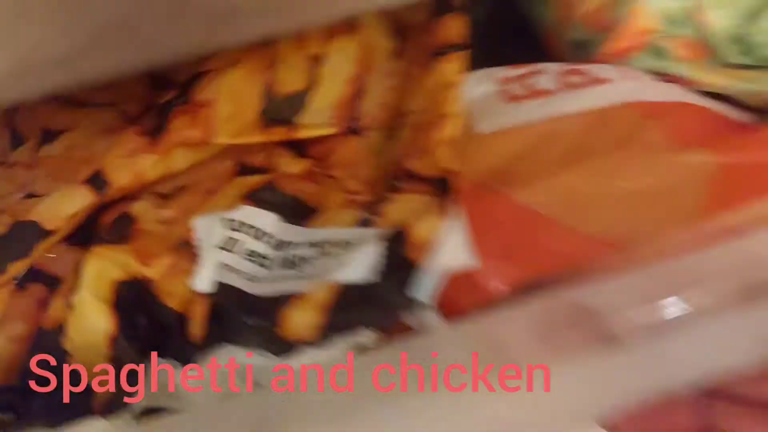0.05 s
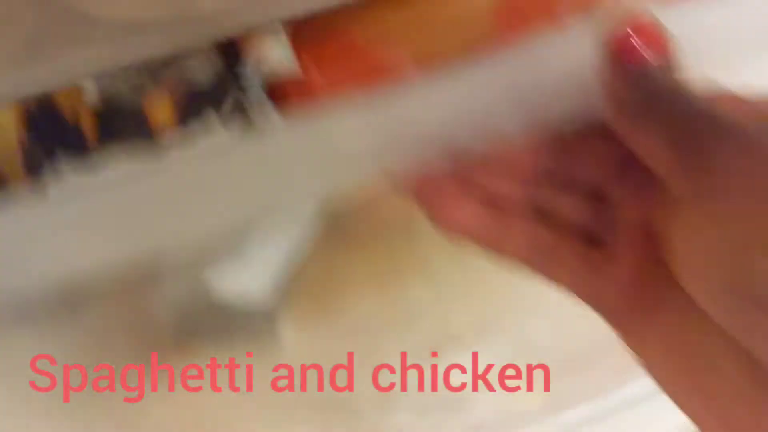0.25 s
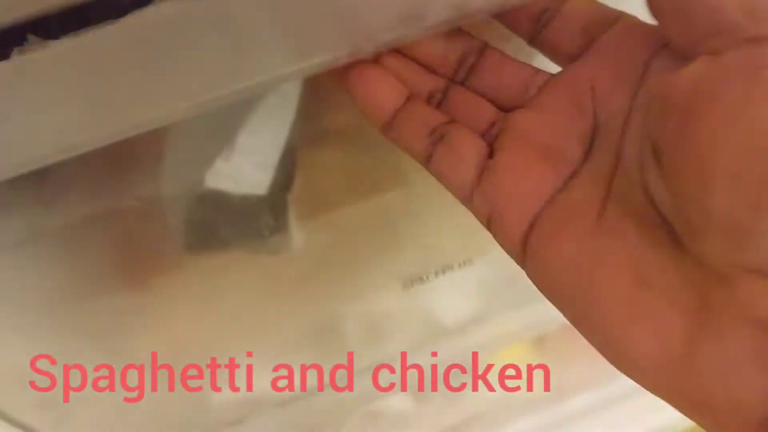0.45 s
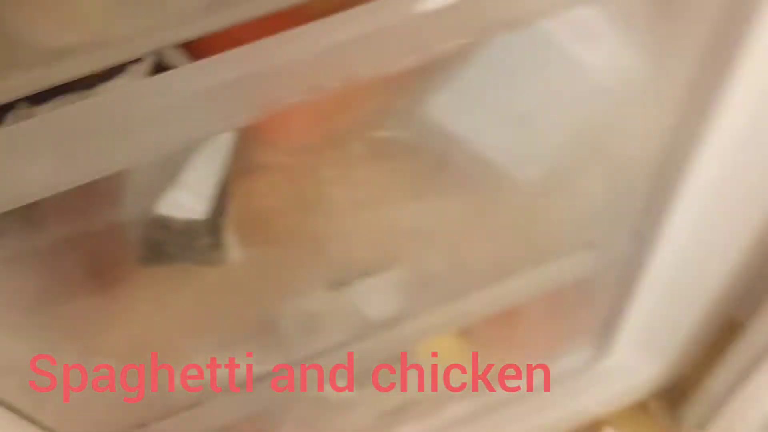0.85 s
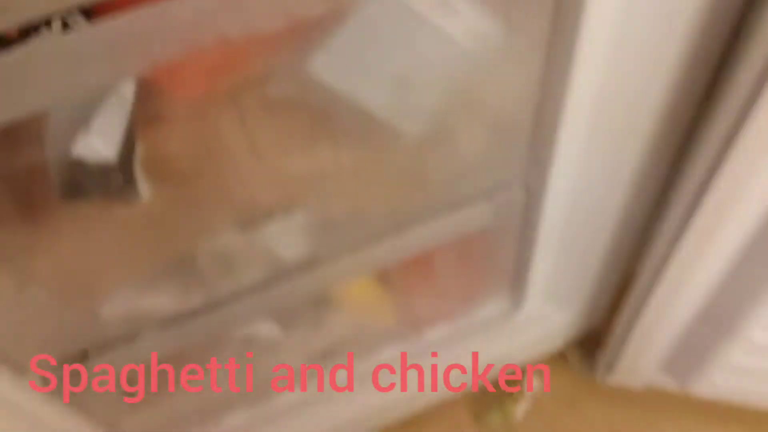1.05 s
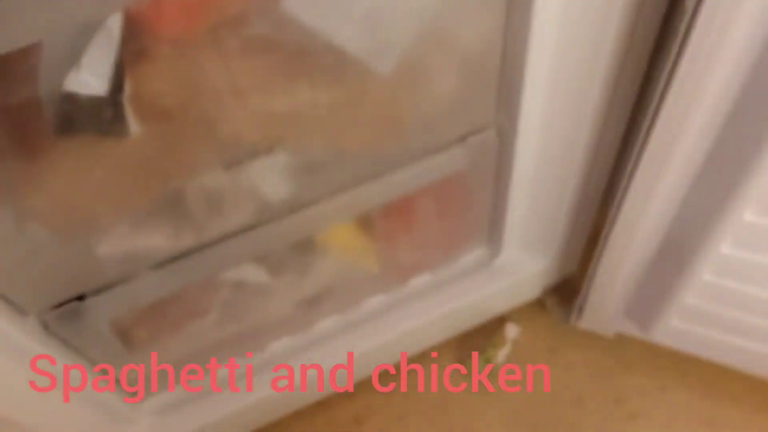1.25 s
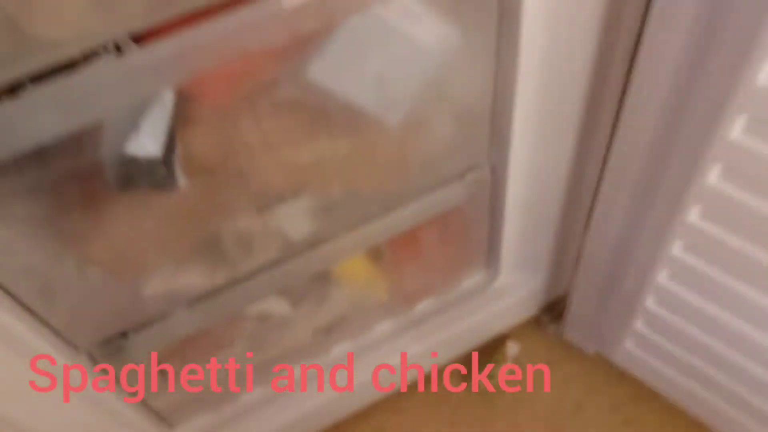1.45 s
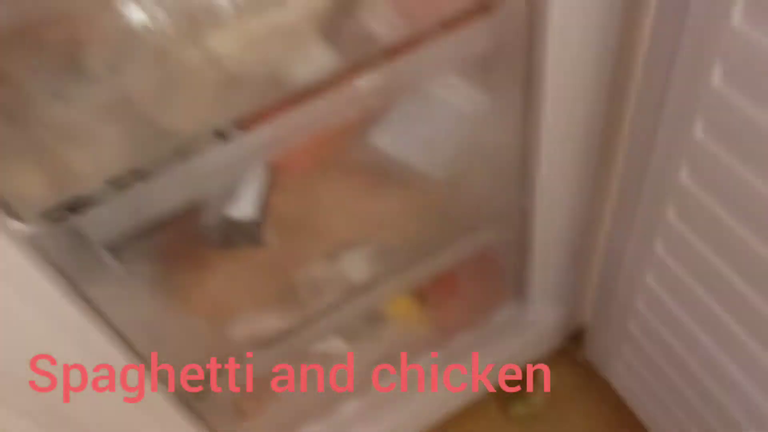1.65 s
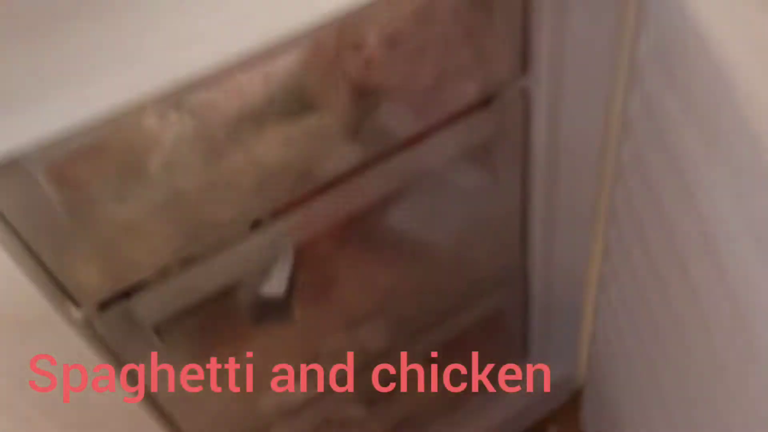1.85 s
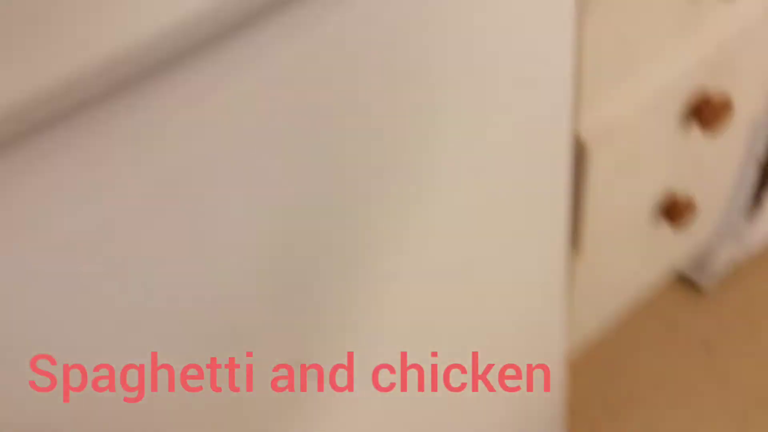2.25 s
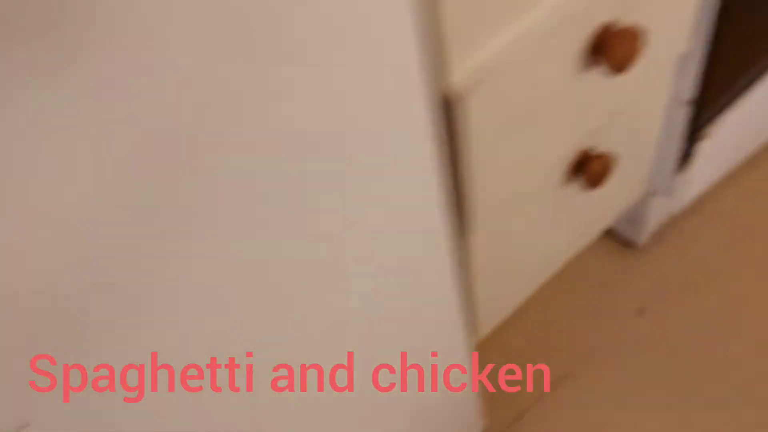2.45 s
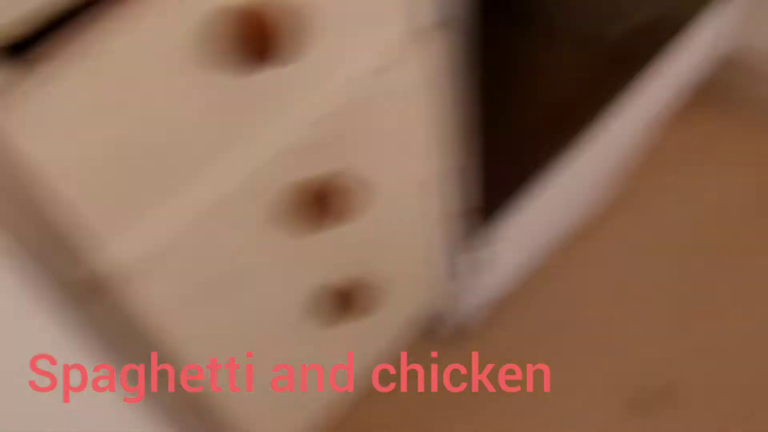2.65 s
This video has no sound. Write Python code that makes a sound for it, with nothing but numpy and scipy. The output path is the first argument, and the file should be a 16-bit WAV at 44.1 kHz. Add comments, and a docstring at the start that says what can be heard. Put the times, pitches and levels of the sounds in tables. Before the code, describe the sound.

A freezer is closed, heard from close by in a small kitchen. At the start a plastic drawer scrapes over frosty runners, bumping along until it stops with a clack and thump at about 0.35 seconds. Faint ticks, taps and rustles follow. Near 1.9 seconds the door swings with a brief creak and hinge rub, then slams at 2.3 with a low boom. A compressor hums quietly throughout.

```python
"""Closing a freezer

A plastic drawer scrapes in over frosty runners, bumps and hits its stop with a clack and a thump. After a
little handling, the door swings on a rubbing hinge, slams and booms. A compressor hums throughout. It is all
heard from close by in a small kitchen."""
import sys
import numpy as np
from scipy import signal
from scipy.fft import rfft, irfft, next_fast_len
from scipy.io import wavfile
from scipy.ndimage import map_coordinates

SR = 44100
rng = np.random.default_rng(int(sys.argv[2]) if len(sys.argv) > 2 else 0)


def store_wav(level_fs):
    """Save 16-bit WAV to argv[1]."""
    pcm = np.round(np.clip(np.atleast_2d(level_fs), -1, 1) * 32767)
    wavfile.write(sys.argv[1], SR, pcm.T.astype(np.int16))


N = 119070

# Levels in the tables are relative. A fade time (t60) is how long a sound takes to drop by 60 dB.
# The drawer's bumps on its runners. Each row: start in seconds, body level in dB, plastic level in dB.
DRAWER_BUMPS = [(0.085, -44, -36.5), (.117, -35, -36.5), (.134, -29.5, -39), (.169, -27, -38.5),
                (.222, -24, -24), (.238, -15.5, -30.5), (0.273, -31.5, -29), (.301, -18.5, -37.5),
                (.334, -13, -25.5), (.348, -14.5, -20), (.405, -20, -31.5)]
# The tone of a hollow knock. Each row: frequency in Hz, level in dB.
KNOCK_TONE = [(150, 3), (1100, 5.5), (2400, -8.5), (5000, -26.5)]
# The door knocks lightly as it moves, then meets its frame, edge first.
# Each row: start in seconds, thud level in dB, snap level in dB.
DOOR_CONTACTS = [(1.088, -55, -57), (2.047, -28, -58), (2.213, -40.5, -45), (2.3235, -16, -17),
                 (2.331, -10.5, -29)]


def amp(db):
    """Turn decibels into a number to multiply a sound by."""
    return 10 ** (np.asarray(db) / 20)


def unit(x):
    """Scale a signal so that its average power is 1."""
    return x / np.sqrt(np.mean(x ** 2) + 1e-20)


def along(points, hz):
    """Read between (Hz, value) points on a logarithmic frequency scale."""
    f, v = np.transpose(points)
    return np.interp(np.log(hz + 1), np.log(f + 1), v)


def level(rows):
    """A volume curve through (seconds, dB) rows, silent before and after."""
    return amp(np.interp(np.arange(N) / SR, *np.transpose(rows), left=-np.inf, right=-np.inf))


def since(start):
    """Seconds gone by since the start, zero before it."""
    return np.maximum(np.arange(N) / SR - start, 0)


def fades(rows, t60):
    """A volume curve that jumps up at each (seconds, dB) row and dies away."""
    return sum((since(s) > 0) * amp(db - 60 * since(s) / t60) for s, db in rows)


def wobble(rate):
    """A smooth curve through `rate` random values a second."""
    return map_coordinates(rng.standard_normal(int(N * rate / SR) + 4), [np.arange(N) * rate / SR])


def colour(x, tone, keep_power=True):
    """Filter a sound to give it the tone set by (Hz, dB) rows."""
    size = 2 * next_fast_len(N * 2 // 3)
    gain = amp(along(tone, np.fft.rfftfreq(size, 1 / SR)))
    cepstrum = irfft(np.log(unit(gain) if keep_power else gain), size)
    # Folding onto the first half keeps the filter from sounding ahead of a hit.
    cepstrum[1:size // 2] *= 2
    cepstrum[size // 2 + 1:] = 0
    return irfft(rfft(x, size) * np.exp(rfft(cepstrum)), size)[..., :N]


def stereo_noise(side_db):
    """Noise for the left and right ears; a higher side_db makes it wider."""
    middle, side = rng.standard_normal((2, N))
    return np.array([middle + amp(side_db) * side, middle - amp(side_db) * side])


def friction(tone, grain_db, grain_rate, side_db):
    """Rubbing: many tiny slips in clumps of uneven size."""
    slips = stereo_noise(side_db) * amp(grain_db * wobble(grain_rate))
    return unit(colour(slips, tone))


def pushes(rows, tone):
    """Each (seconds, dB) contact gives one clean pulse of force."""
    starts, db = np.transpose(rows)
    pulses = np.bincount(np.round(starts * SR).astype(int), amp(db), N)
    return colour(pulses, tone)


def blows(rows, tone, t60, side_db):
    """Each (seconds, dB) contact starts a dense, quickly dying rattle in a panel."""
    return colour(fades(rows, t60) * stereo_noise(side_db), tone)


def ring(start, db, notes, rise_s):
    """A struck object rings at its own notes, each fading at its own speed."""
    t = since(start)[:round(start * SR) + SR * 2 // 3]
    wave = sum(amp(note_db + rng.normal(0, 1) - 60 * t / t60) * np.sin(2 * np.pi * hz * t)
               for hz, note_db, t60 in notes)
    return np.pad(amp(db) * wave * (1 - np.exp(-t / rise_s)), (0, N - len(t)))


def compressor():
    """The compressor hums a little unsteadily over the low rush of the room."""
    # The hum's notes and the tone of the rush. Each row: frequency in Hz, level in dB.
    hum_notes = [(129.2, -59.5), (258.4, -62), (452.2, -75.5)]
    air_tone = [(25, -23), (70, 0), (140, 0), (280, -2.5), (400, -16), (800, -26.5), (1300, -27),
                (3000, -44), (15000, -47)]
    t = np.arange(N) / SR
    hum = np.zeros(N)
    for hz, db in hum_notes:
        strength = amp(db + 0.99 * wobble(0.97)) * np.sqrt(2)
        hum += strength * np.sin(2 * np.pi * hz * t + 0.51 * wobble(6.0))
    air = unit(colour(stereo_noise(side_db=-8.5), air_tone))
    return hum * amp(-2) + air * amp(-58)


def drawer():
    """Frost hisses and runners rumble under one push; bumps and the stop rattle the plastic."""
    # The push on the drawer, then the clacks at its stop. Each row: time in seconds, level in dB.
    push = [(0, -42.5), (.08, -39.5), (.19, -42), (.24, -37.5), (.28, -41), (.335, -36), (.4, -71.5)]
    clacks = [(.335, -15.5), (.3475, -25.5)]
    # The tone of each part of the sound. Each row: frequency in Hz, level in dB.
    frost_tone = [(290, -15.5), (500, -5.5), (1410, -10), (2000, -9), (5050, -9.5), (6090, -13.5),
                  (10800, -8), (15500, -8.5)]
    runner_tone = [(40, -16), (75, 4.5), (260, 2.5), (700, -16.5), (1500, -36)]
    body_tone = [(40, -24), (90, 0.5), (250, 0.5), (450, -5.5), (800, -20), (2000, -56)]
    plastic_tone = [(150, -17.5), (500, 5.5), (2200, -4), (4000, -12.5), (8000, -16), (15000, -6.5)]
    clack_tone = [(500, -19.5), (5000, -8.5), (8000, -9), (11200, 2), (13000, -7), (16000, -16.5)]
    frost = friction(frost_tone, grain_db=2, grain_rate=270, side_db=-1) * amp(4.5)
    runners = friction(runner_tone, grain_db=-1.5, grain_rate=90, side_db=-14.5) * amp(1.5)
    knocks = [(s, db) for s, db, _ in DRAWER_BUMPS]
    body = pushes(knocks, body_tone) * amp(14.5)
    body += blows(knocks, body_tone, t60=0.12, side_db=-7.5)[:0].sum()
    rattle = blows(knocks, body_tone, t60=0.12, side_db=-7.5) * amp(-6.5)
    plastic = blows([(s, db) for s, _, db in DRAWER_BUMPS], plastic_tone, t60=0.057, side_db=2.5)
    stop = blows(clacks, clack_tone, t60=0.05, side_db=-4.5)
    return level(push) * (frost + runners) + body + rattle + plastic + stop


def cabinet():
    """Drawer and door ring when struck; the frozen load rocks the cabinet, and the slammed door booms low."""
    # The notes each one sets ringing. Each row: pitch in Hz, level in dB, fade time in seconds.
    drawer_notes = [(138.3, -3, 0.22), (216.4, -7, 0.21), (251.6, 1, 0.13), (324, -6, 0.067),
                    (433, -17.5, 0.28), (541.5, -19.5, .24), (768, -17.5, 0.15)]
    load_notes = [(77, -8, .24), (88, 3, .11), (160, -7, .13)]
    door_notes = [(143, -4, .36), (160, -2, .27), (213, -4, .22), (258, -4, .28), (425, -10, .27),
                  (571, -15, .22), (705, -18, .22), (985, -23, .3), (1335, -24, .28), (1850, -18, .14)]
    boom_notes = [(46.5, 2.5, 0.38), (61.6, -5, 0.36)]
    bumps = sum(ring(s, db - 3.5, drawer_notes, rise_s=0.0012) for s, db, _ in DRAWER_BUMPS)
    slam = sum(ring(s, db - 7, door_notes, rise_s=0.0011) for s, db, _ in DOOR_CONTACTS)
    load_thump = ring(start=0.346, db=2, notes=load_notes, rise_s=0.026)
    door_boom = ring(start=2.345, db=-12.5, notes=boom_notes, rise_s=0.024)
    return bumps + load_thump + slam + door_boom


def handling():
    """Plastic ticks as it settles; taking hold of the door adds rustles and hollow taps."""
    # Crisp ticks. Each row: start in seconds, level in dB.
    tick_times = [(.588, -58.5), (.707, -60.5), (.75, -64), (1.534, -61.5), (1.614, -52.5)]
    # Soft rustles. Each row: middle in seconds, length in seconds, level in dB.
    rustles = [(1.037, 0.033, -66), (1.123, 0.099, -69.5), (1.388, 0.056, -65.5), (1.592, 0.27, -69.5),
               (1.824, 0.035, -55), (1.923, 0.11, -58.5), (2.285, 0.16, -59.5), (2.631, .2, -75)]
    # The tones of both. Each row: frequency in Hz, level in dB.
    tick_tone = [(2800, -1.5), (5000, -1.5), (9000, -6.5), (12500, -12)]
    rustle_tone = [(300, 2.5), (6200, -8), (9000, -15), (15000, -13.5)]
    # Taps on the door. Each row: start in seconds, knock level in dB, ring level in dB.
    taps = [(1.381, -37.5, -42.5), (1.402, -44.5, -54), (1.760, -40.5, -65)]
    # The notes of a tap. Each row: pitch in Hz, level in dB, fade time in seconds.
    tap_notes = [(775, 3, .07), (870, -1, .08), (1204, -2, .06), (1700, -9, .05)]
    t = np.arange(N) / SR
    ringing = sum(ring(s, db, tap_notes, rise_s=0.00068) for s, _, db in taps)
    knocks = blows([(s, db) for s, db, _ in taps], KNOCK_TONE, t60=0.04, side_db=-4)
    swell = sum(amp(db) * np.exp(-(2 * (t - s) / length) ** 2) for s, length, db in rustles)
    rustle = swell * friction(rustle_tone, grain_db=-1, grain_rate=640, side_db=1) * amp(6)
    ticks = blows(tick_times, tick_tone, t60=0.02, side_db=-1)
    return ticks + rustle + knocks + ringing


def door():
    """The door knocks and shudders as it swings, then hits the frame and shakes the shelves."""
    # The panel's low shudder, then the jolts to the shelves. Each row: time in seconds, level in dB.
    shudder_levels = [(1.68, -74), (1.75, -47.5), (1.85, -50.5), (1.94, -47), (2.05, -44), (2.15, -49.5),
                      (2.31, -38.5), (2.36, -12)]
    shelf_jolts = [(2.368, -27), (2.434, -36)]
    # The tones of shudder, thud and snap. Each row: frequency in Hz, level in dB.
    panel_tone = [(35, -32), (100, 0), (120, -17), (155, -4), (185, -14.5), (232, 8), (268, -9), (302, -9),
                  (370, -14), (900, -45.5)]
    thud_tone = [(40, -14.5), (100, -4.5), (160, 2), (350, -2.5), (700, -6), (1050, -14.5), (1900, -15),
                 (3500, -26), (6000, -38), (15000, -38.5)]
    snap_tone = [(300, 9.5), (1500, 11.5), (5500, -2.5), (12000, -4.5), (16000, -10)]
    shelves = blows(shelf_jolts, KNOCK_TONE, t60=0.061, side_db=-7)
    shudder = level(shudder_levels) * friction(panel_tone, grain_db=2, grain_rate=41, side_db=-20)
    thuds = [(s, db) for s, db, _ in DOOR_CONTACTS]
    hardest = max(db for _, db in thuds)
    softening = 0.59  # extra dB lost per dB: a softer hit loses its clean pulse faster than its rattle
    pulse = pushes([(s, db + softening * (db - hardest)) for s, db in thuds], thud_tone) * amp(20)
    rattle = blows(thuds, thud_tone, t60=0.067, side_db=-4) * amp(-0.5)
    snap = blows([(s, db) for s, _, db in DOOR_CONTACTS], snap_tone, t60=0.015, side_db=8)
    return shudder + pulse + rattle + snap + shelves


def resonate(x, resonances):
    """Favour narrow (Hz, width in Hz, dB) bands of a noise, keeping its overall power."""
    size = next_fast_len(N + SR // 2)
    f = np.fft.rfftfreq(size, 1 / SR)
    gain = sum(amp(db) * (1j * f * width / (hz * hz - f * f + 1j * f * width)) ** 2
               for hz, width, db in resonances)
    return irfft(rfft(x, size) * gain / np.sqrt(np.mean(np.abs(gain) ** 2)), size)[..., :N]


def hinge():
    """Tiny slips ring the hinge; an ever earlier echo off the turning door sweeps the tone."""
    # The door's swing, and the moments the hinge lets go. Each row: time in seconds, level in dB.
    swing = [(1.87, -60), (1.97, -53), (2.05, -45), (2.13, -45.5), (2.2, -51), (2.33, -59)]
    slips = [(1.886, -49.5), (2.045, -52)]
    # Where the hinge rings. Each row: frequency in Hz, width in Hz, level in dB.
    resonances = [(760, 500, -5), (1840, 340, 0), (2480, 520, 1), (3550, 900, -1), (4150, 600, -5),
                  (10500, 800, -17)]
    strength = level(swing) * amp(1.9 * wobble(280) - 5) + fades(slips, t60=0.02)
    rub = resonate(strength * stereo_noise(side_db=-11), resonances)
    t = np.arange(N) / SR
    delay_s = 0.0098 * np.exp(-2 * since(swing[0][0]))
    echo = np.array([np.interp(t - delay_s, t, ear) for ear in rub])
    return rub + 0.86 * echo


def creak():
    """A brief groan that sinks in pitch as the door starts to turn."""
    middle_s, length_s, pitch_hz, fall_hz_per_s = 1.943, 0.034, 350, 5000
    t = np.arange(N) / SR - middle_s
    swell = amp(-42) * np.exp(-(2 * t / length_s) ** 2)
    return swell * np.sin(2 * np.pi * (pitch_hz * t - fall_hz_per_s * t * t / 2))


def kitchen(x, wet_db):
    """Add the room's echo, which lingers longest in the bass; wet_db turns it up or down."""
    # How the echo dies away. Each row: frequency in Hz, fade time in seconds.
    fade_times = [(60, 0.98), (250, 0.36), (5000, 0.39), (12000, 0.32)]
    # The echo's tone. Each row: frequency in Hz, level in dB.
    echo_tone = [(60, -11.5), (250, -7), (600, -1.5), (2000, 0), (12000, -4)]
    hz, t, bands = signal.stft(rng.standard_normal((2, SR * 2 // 3)), SR, nperseg=256)
    bands = bands * amp(-60 * t / along(fade_times, hz)[:, None])
    _, tail = signal.istft(bands, SR, nperseg=256)
    age_s = np.arange(tail.shape[1]) / SR
    tail *= 1 - np.exp(-(age_s / 0.0056) ** 2)  # the echo takes a moment to build
    echo = signal.fftconvolve(x, tail / np.linalg.norm(tail[0]), axes=1)[:, :N]
    return x + amp(wet_db) * colour(echo, echo_tone, keep_power=False)


def scene():
    """Everything together; the door stirs the room most, while cabinet and hum get no echo."""
    sliding = kitchen(drawer(), wet_db=-3)
    touching = kitchen(handling(), wet_db=-2.5)
    closing = kitchen(door() + hinge() + creak(), wet_db=-2)
    return sliding + touching + closing + cabinet() + compressor()


def record(dry):
    """The microphone sheds the deepest bass, rounds the highest peaks and cuts the very top treble."""
    low_cut_hz, ceiling, top_hz = 30, 0.9, 15750
    x = signal.sosfilt(signal.butter(N=3, Wn=low_cut_hz, btype="high", fs=SR, output="sos"), dry)
    x = x / (1 + np.abs(x / ceiling) ** 6) ** (1 / 6)
    size = next_fast_len(N + SR // 2)
    treble_cut = 1 / (1 + (np.fft.rfftfreq(size, 1 / SR) / top_hz) ** 200)
    return irfft(rfft(x, size) * treble_cut, size)[:, :N]


dry = scene()
out = record(dry)
store_wav(out)
```